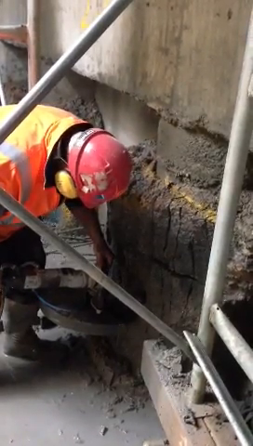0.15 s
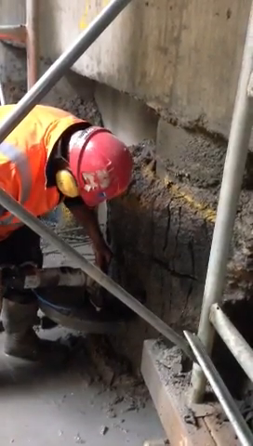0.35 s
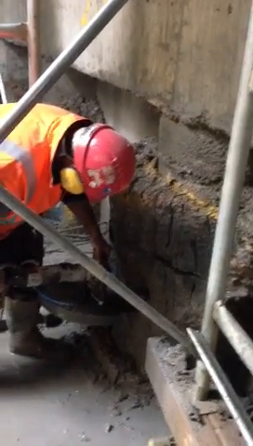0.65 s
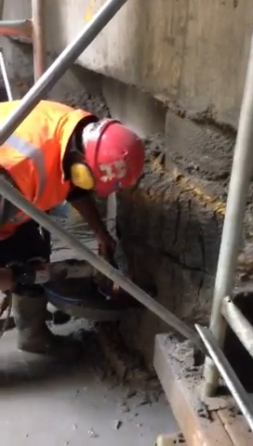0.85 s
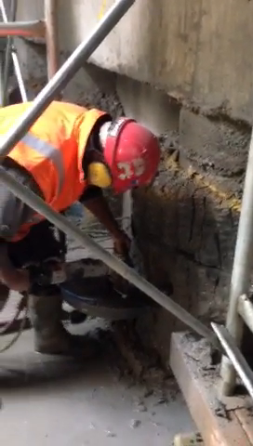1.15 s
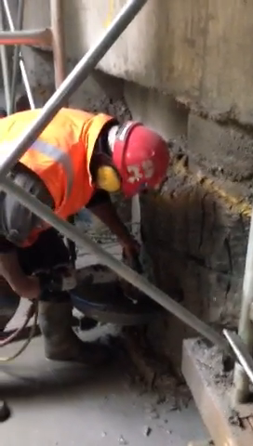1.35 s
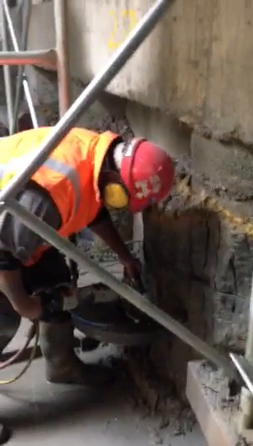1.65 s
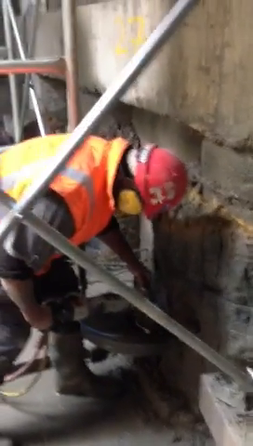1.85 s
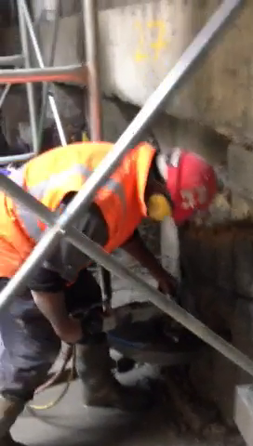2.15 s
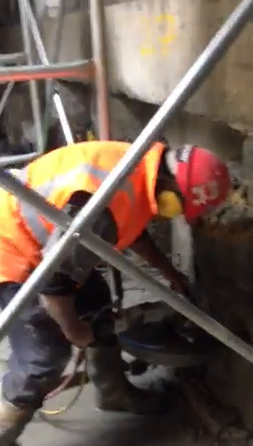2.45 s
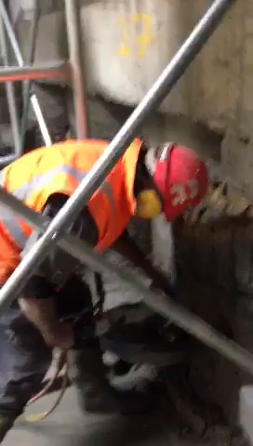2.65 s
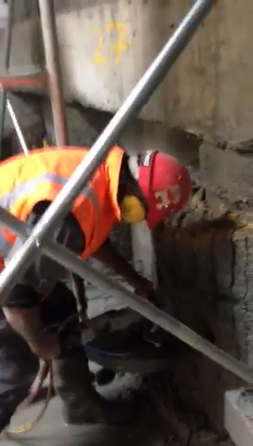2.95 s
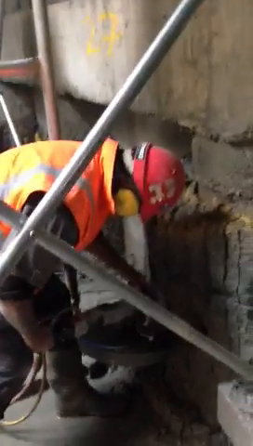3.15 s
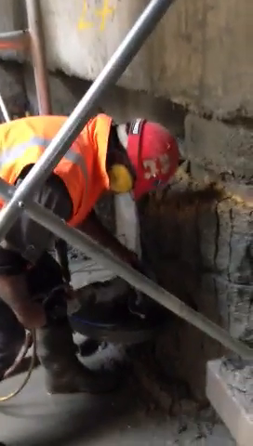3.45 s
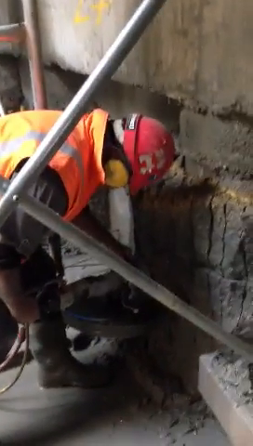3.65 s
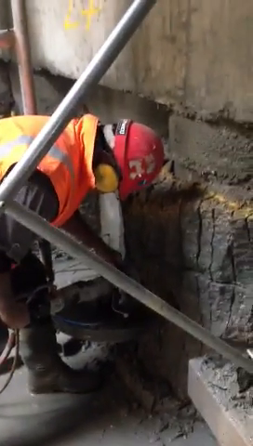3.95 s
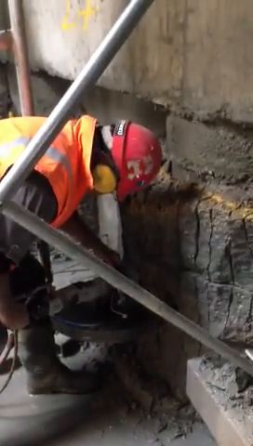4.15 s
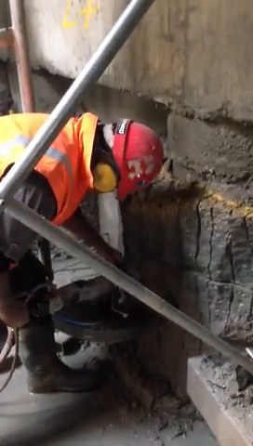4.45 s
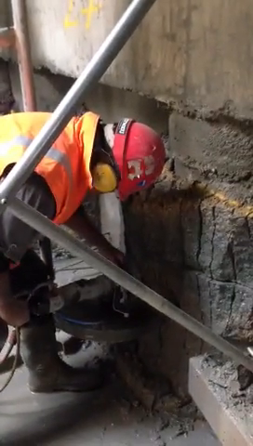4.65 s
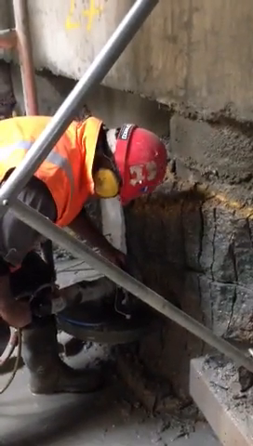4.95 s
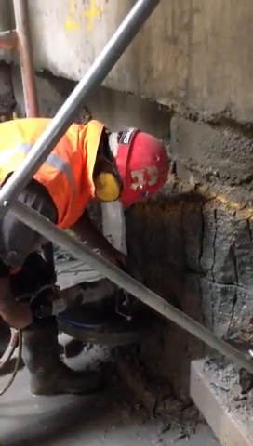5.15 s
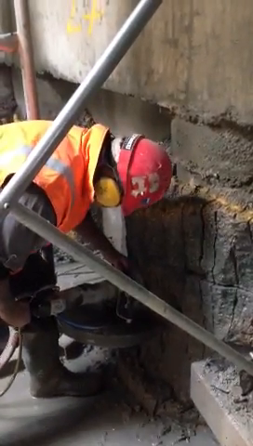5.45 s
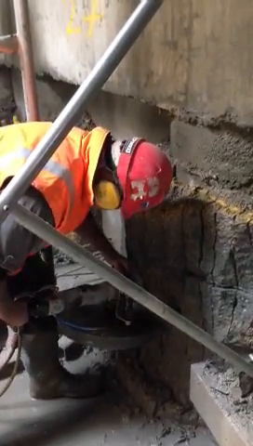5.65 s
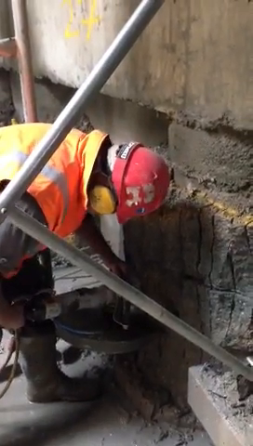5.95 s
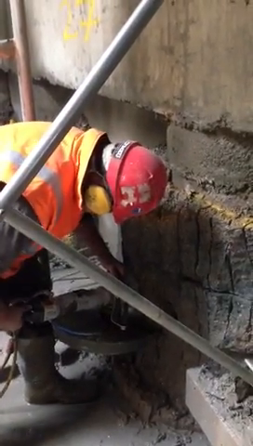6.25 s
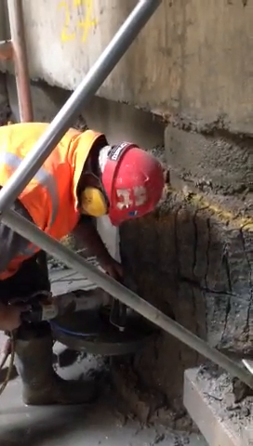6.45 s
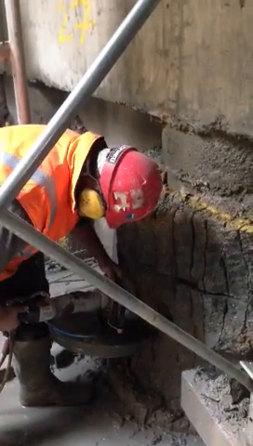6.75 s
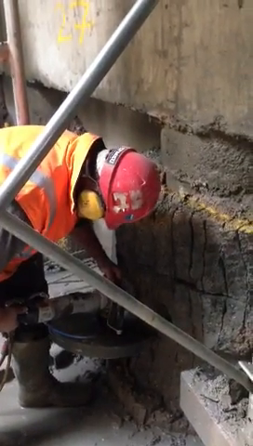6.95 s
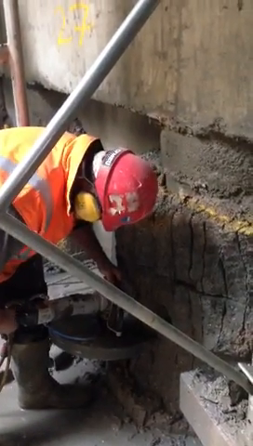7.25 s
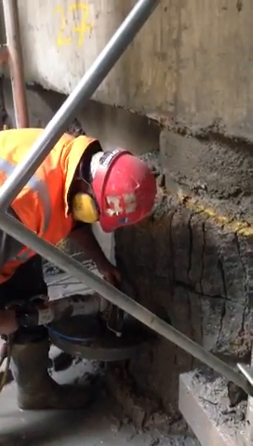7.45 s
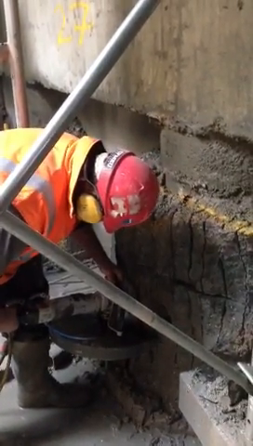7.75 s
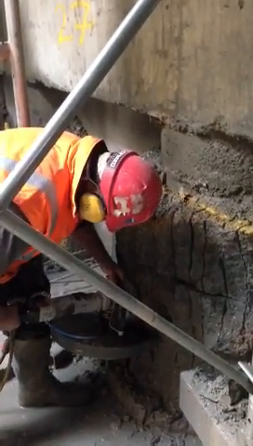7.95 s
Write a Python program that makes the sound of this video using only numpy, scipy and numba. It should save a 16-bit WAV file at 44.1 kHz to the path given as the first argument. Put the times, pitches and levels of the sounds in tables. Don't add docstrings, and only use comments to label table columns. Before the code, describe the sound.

An electric diamond saw is at full cut from 0 s, loud and unbroken for about eight seconds. The main sound is a harsh, bright, gritty roar of blade on concrete, strongest around 3 to 6 kHz, with spray-like hiss above and a fast flutter from some 45 blade turns a second. Steel ringing and gear-like whines slide in and out. Pushing hardest around 2 to 3 s, the cut screams more sharply; from 3 s the pitch sags, a strong whine near 3.5 kHz standing out at 3.8 s, lowest around 4.2 to 4.4 s. It climbs back by 4.8 s and peaks near 6.1 s, with brief dips in grip and a throatier growl. A harder housing drag and thump comes at 6.4 s. Low wet rubble and hose thumps scatter throughout, clustered near 2.6 s. Mono phone, a few metres away, little bass, slightly crushed treble; cutting continues to the end.

```python
import sys
import numpy as np
from scipy import signal
from scipy.fft import rfft, irfft, next_fast_len
from scipy.io import wavfile
from scipy.ndimage import uniform_filter1d, map_coordinates
from numba import njit

SR = 44100
rng = np.random.default_rng(int(sys.argv[2]) if len(sys.argv) > 2 else 0)


def to_wav(sig):
    pcm = np.clip(np.atleast_2d(sig), -1, 1) * 32767
    pcm = np.round(pcm).astype(np.int16)
    wavfile.write(sys.argv[1], SR, pcm.T)


def magnitude_from_level(level_db):
    exponent = np.asarray(level_db, float) / 20
    return 10 ** exponent


N = 357651
TICKS = np.arange(0, N + 64, 64) / SR


def curve(table):
    s, *columns = np.transpose(table)
    return [np.interp(TICKS, s, c) for c in columns]


def fine(slow):
    return np.interp(np.arange(N) / SR, TICKS, slow)


def on_log(hz, table):
    points, values = np.transpose(table)
    return np.interp(np.log(np.maximum(hz, 1)), np.log(points), values)


def unit(x):
    return x / np.sqrt(np.mean(x ** 2))


def walk(rate):
    k = max(round(1 / (rate * TICKS[1])), 1)
    held = np.repeat(rng.standard_normal(len(TICKS) // k + 1), k)
    slewed = uniform_filter1d(uniform_filter1d(held, k), k)
    return unit(slewed[:len(TICKS)])


def bump(at_s, length_s):
    return np.exp(-((TICKS - at_s) / length_s) ** 2)


def swells(table):
    return sum(magnitude_from_level(db) * bump(at_s, length_s) for at_s, length_s, db in table)


def slab(x, low_hz, high_hz):
    size = next_fast_len(N)
    hz = np.arange(size // 2 + 1) * SR / size
    return irfft(rfft(x, size) * (hz > low_hz) * (hz < high_hz), size)[:N]


# time in seconds, speed in turns per second.
BLADE_SPEED = [(0, 46.19), (.32, 46.38), (.97, 45.23), (1.53, 45.72), (2.4, 45.22), (2.75, 45.56),
               (3.1, 44.5), (3.5, 42.15), (3.85, 41.65), (4.18, 40.72), (4.42, 40.75), (4.8, 44.45),
               (5.35, 44.65), (5.76, 45.35), (6.08, 47.15), (6.7, 45.03), (7.27, 46.04), (8.11, 44.1)]


def blade_angle():
    speed = uniform_filter1d(curve(BLADE_SPEED)[0], size=100)
    return np.cumsum(fine(speed)) / SR


# frequency in Hz, share from 0 to 1.
REPEATING_SHARE = [(200, 0.2), (1200, 0.51), (2300, 0.47), (4000, 0.36), (6500, 0.17), (11000, 0.08)]


def scrape(angle):
    steps = 1024
    memory = 0.863
    grit = rng.standard_normal((int(angle[-1]) + 2, steps))
    worn = signal.lfilter([1], [1, -memory], grit, axis=0).ravel()
    size = next_fast_len(N)
    hz = np.arange(size // 2 + 1) * SR / size
    again = rfft(map_coordinates(worn, [angle * steps], order=3), size)
    again /= np.sqrt(uniform_filter1d(abs(again) ** 2, size=8000))
    fresh = rfft(rng.standard_normal(size)) / np.sqrt(size)
    share = np.clip(on_log(hz, REPEATING_SHARE), 0, 1)
    return hz, np.sqrt(share) * again + np.sqrt(1 - share) * fresh


# frequency in Hz, level in dB per Hz.
SAW_AND_WALL = [(35, -78), (60, -47.5), (192, -19), (273, -17.5), (456, -15), (761, -21.5), (1150, -16),
                (1690, -16), (2850, -4.5), (3800, 0), (6500, -4.5), (6970, -8), (11600, -8.5), (14300, -14),
                (15800, -21)]


def coloured_bands(angle):
    hz, force = scrape(angle)
    ripple = uniform_filter1d(rng.standard_normal(len(hz)), size=900)
    ripple = unit(uniform_filter1d(ripple, size=900))
    colour = force * magnitude_from_level(on_log(hz, SAW_AND_WALL) + 0.7 * ripple)
    edges = np.array([0, 300, 1700, 3700, 7300, SR])
    return [irfft(colour * (hz >= a) * (hz < b))[:N] for a, b in zip(edges, edges[1:])]


@njit
def ring(x, g, k):
    y, b, l = np.empty(len(x)), 0., 0.
    for i in range(len(x)):
        v = (b + g[i] * (x[i] - l)) / (1 + g[i] * (g[i] + k))
        b, l, y[i] = 2 * v - b, l + 2 * g[i] * v, k * v
    return y


# frequency in Hz, width in
# Hz, level in dB, time of the change in seconds, its length in seconds, change in dB.
BLADE_MODES = [(490, 70, -28, 6.7, 3.4, 27.5), (633, 21, -4, 0.66, 2.2, 8), (2010, 76, -5, 0.25, 0.36, 8),
               (2490, 78, -4.5, 4.1, 0.97, 8), (2702, 42, 0.5, .1, 0.66, 11),
               (2983, 55, -2.5, 0.88, 0.66, 12), (3213, 38, 0.5, 6.3, 0.89, 10),
               (3527, 64, 3, 5.26, 0.45, 5), (3915, 48, -13, 7.67, .5, 20), (4096, 30, -1, 4.8, 0.83, 9),
               (4620, 68, -5, 1.3, 0.41, 1), (5044, 91, 0, 5.1, 0.59, 3), (5470, 83, -2, 7.5, 0.93, -5),
               (6490, 32, 0, 0.91, 1.2, -8), (7040, 76, 3, 6.7, 0.24, 5), (7620, 92, -1.5, 2.7, 0.47, 3)]


def blade_ringing(drive):
    total = np.zeros(N)
    for mode_hz, width_hz, db, at_s, length_s, swell_db in BLADE_MODES:
        drift = 1 + .005 * walk(3)
        mode = ring(drive, fine(np.tan(np.pi * mode_hz * drift / SR)), width_hz / mode_hz)
        total += mode * fine(magnitude_from_level(db + swell_db * bump(at_s, length_s) + 2.3 * walk(8)))
    return total


# time in seconds, length in seconds, level in dB.
RUBBLE_THUMPS = [(.01, 0.055, -45), (.3, 0.26, -49), (.72, 0.077, -44), (1.05, 0.088, -52),
                 (1.33, 0.1, -58), (1.83, .03, -59), (2.44, 0.066, -48), (2.57, 0.026, -39),
                 (2.66, 0.07, -41.5), (2.86, 0.091, -42), (2.96, .04, -53), (3.56, 0.053, -60),
                 (3.75, 0.036, -56), (4.12, 0.086, -47), (4.38, 0.081, -45.5), (5.15, 0.49, -52),
                 (5.51, 0.023, -43), (5.64, 0.074, -52), (6.13, .12, -53), (6.42, 0.096, -40),
                 (7.02, 0.072, -45), (7.25, 0.083, -49), (7.68, 0.16, -51), (7.91, 0.044, -47)]
# time in seconds, length in seconds, dB over its usual noise.
HOUSING_SCRAPES = [
    (.03, 0.088, -11),
    (6.43, 0.095, 0.5),
]


def housing_and_rubble(housing, rumble, cut_db, growl_db):
    thumps = swells(RUBBLE_THUMPS)
    shaking = 1 + magnitude_from_level(37.5) * thumps / 2 + swells(HOUSING_SCRAPES)
    body = housing * fine(magnitude_from_level(cut_db - 2.5 + 1.2 * growl_db) * shaking)
    knocking = magnitude_from_level(0.5 * walk(32))
    rubble = unit(rumble) * fine((magnitude_from_level(-56.5 + 1.2 * growl_db) + thumps) * knocking)
    return body + rubble


# time in seconds, grinding in dB, water spray over it in dB,
# burial of the rim in dB of growl.
CUT_PUSH = [(0, -17, -2.5, 0.5), (.5, -17.9, -1.5, 0.5), (1.0, -17, -2.5, -1.1), (1.5, -17, -3, 1.5),
            (2.0, -16, -3.5, -1.5), (2.35, -16.5, -1.5, -2), (2.66, -15.5, -.5, -2.5),
            (3.04, -16.5, -4, -1), (3.45, -17, -4, -0.7), (3.8, -18, -5, -.4), (4.4, -17.5, -3, 1.4),
            (4.85, -18, -2, 1.9), (5.45, -17.3, -3, 3), (5.75, -17, -3, -.5), (6.27, -19.5, -3, 5),
            (6.65, -17, -3.5, -0.5), (7.2, -17.5, -3.5, 1.8), (8.11, -18.5, -2, 1.9)]
# time in seconds, change in dB.
GRIP_SLIPS = [(.36, 2), (.45, -3), (.77, -2), (1.16, -1), (3.28, 0), (4.95, -0.5), (5.41, -2.5), (5.58, -2),
              (5.66, 0.5), (5.89, -1.5), (6.04, -2), (6.27, -2.5), (6.37, -2), (6.54, 0.5), (7.13, -2),
              (7.38, -2), (7.52, -0.5)]


def grinding(angle):
    cut_db, spray_db, growl_db = curve(CUT_PUSH)
    slip_s = 0.029
    cut_db = cut_db + sum(db * bump(at_s, slip_s) for at_s, db in GRIP_SLIPS)
    rumble, housing, growl, grind, spray = coloured_bands(angle)
    scale = 1 / np.std(slab(grind, 4000, 7000))
    grind = grind + growl * fine(magnitude_from_level(growl_db))
    grind = grind + blade_ringing(housing + grind + spray)
    water = unit(spray) * fine(magnitude_from_level(spray_db + 0.51 * walk(40)))
    high = scale * grind * magnitude_from_level(-1.1) + water
    low = housing_and_rubble(scale * housing, rumble, cut_db, growl_db)
    bite_db = 0.56 * np.cos(2 * np.pi * angle) + 0.2 * np.cos(4 * np.pi * angle)
    bite_db += 0.46 * fine(walk(14))
    return (high * fine(magnitude_from_level(cut_db)) + low) * magnitude_from_level(bite_db)


def partials(angle, orders, gains):
    out = np.zeros(N)
    for order, gain in zip(orders, gains):
        gain = fine(gain * magnitude_from_level(2.2 * walk(35)))
        on = gain > magnitude_from_level(-75)
        out[on] += gain[on] * np.sin(2 * np.pi * (order * angle[on] + rng.random()))
    return np.sqrt(2) * out


CONTACT_ORDERS = (22, 66, 28, 56, 84, 112, 140)
CONTACT_HUM = (-53, -53, -49.5, -57, -59.5, -44, -52)
# time in seconds, length in seconds, level in dB.
GEAR_BITES = [(.3, 0.12, -53), (1.3, 0.66, -43), (2.27, 0.35, -39), (2.95, 0.28, -41), (3.45, 0.13, -39),
              (4.3, 0.63, -49), (5.05, .17, -43), (5.5, 0.17, -40.5), (6.0, 0.064, -34), (6.33, 0.16, -37),
              (7.85, 0.34, -46.5)]
GEAR_3RD_BITES = [(.7, 0.16, -25), (1.0, 0.12, -23), (1.33, 0.088, -34), (1.7, .12, -30), (2.0, .1, -27),
                  (2.8, 0.3, -30.5), (4.45, 0.13, -35), (5.0, 0.079, -31), (6.55, .12, -32),
                  (7.17, .1, -28), (7.5, .12, -31)]
SEGMENT_BITES = [
    (.02, .15, -39),
    (.83, 0.084, -38),
    (2.25, 0.19, -41.5),
    (3.0, 0.24, -46),
    (5.08, 0.15, -40),
    (5.8, 0.22, -48),
    (7.0, .1, -39),
    (7.6, .18, -39.5),
    (8.0, .1, -46),
]
SEGMENT_2ND_BITES = [(1.3, 0.26, -45), (1.83, 0.086, -32), (3.38, 0.16, -25.5), (4.03, 0.1, -29),
                     (4.33, 0.22, -32), (4.97, 0.19, -28), (5.33, .1, -32), (5.671, .1, -31),
                     (6.0, .1, -38), (6.8, 0.16, -30.5), (8.05, .2, -41)]
SEGMENT_3RD_BITES = [(.35, .25, -28), (.68, 0.12, -29), (1.0, 0.14, -26), (1.65, 0.44, -24),
                     (2.45, 0.15, -20.5), (2.83, .1, -24), (3.12, .17, -24.5), (3.48, .17, -21),
                     (3.8, 0.18, -12.5), (4.15, .1, -32), (4.5, .1, -32), (7.12, 0.3, -24)]
SEGMENT_4TH_BITES = [
    (.08, .17, -29),
    (.82, .1, -26),
    (1.33, .1, -33),
    (2.2, 0.17, -30),
    (2.5, .12, -21),
    (2.75, .17, -27),
    (3.35, .22, -32),
    (4.0, 0.11, -26),
    (6.75, .15, -30),
    (7.5, .12, -34),
]
SEGMENT_5TH_BITES = [
    (.6, .2, -36),
    (1.2, .25, -33),
    (1.67, .1, -26),
    (2.05, .2, -33),
    (2.72, 0.15, -24),
    (3.0, 0.085, -38),
    (4.05, .15, -37),
    (7.0, .3, -41),
]


def contact_whine(angle):
    bites = (GEAR_BITES, GEAR_3RD_BITES, SEGMENT_BITES, SEGMENT_2ND_BITES,
             SEGMENT_3RD_BITES, SEGMENT_4TH_BITES, SEGMENT_5TH_BITES)
    gains = [magnitude_from_level(db) + swells(table) for db, table in zip(CONTACT_HUM, bites)]
    return partials(angle, CONTACT_ORDERS, gains)


HIGH_ORDERS = (168, 196, 224, 252, 280, 308, 336)
HIGH_LEVELS = (-50, -54, -55, -57, -57, -59, -59)


def high_whine(angle):
    gains = [magnitude_from_level(db + 3.2 * walk(4.6)) for db in HIGH_LEVELS]
    return partials(angle, HIGH_ORDERS, gains)


PASSING_ORDERS = (44, 5, 7, 70, 14, 70, 47, 70, 60, 44, 10, 14, 60, 42, 5, 70, 11, 7, 5, 4, 70, 44, 60)
# time in seconds, length in seconds, level in dB.
PASSING_SWELLS = [(0.23, 0.41, -35), (0.105, 0.39, -52), (0.96, 0.32, -52), (0.62, .2, -27.5),
                  (1.54, 0.42, -46.5), (1.42, 0.18, -29), (2.1, 0.36, -51), (2.04, 0.22, -33),
                  (2.6, 0.18, -47), (3.65, 0.45, -37), (3.962, 0.3, -47), (4.94, 0.26, -42),
                  (5.16, 0.42, -31), (5.36, 1, -41.5), (5.55, 0.24, -51), (5.4, 0.3, -39), (7.8, 1, -56),
                  (7.2, 0.54, -47.5), (7.29, .4, -50.5), (7.372, 0.43, -53), (7.27, 0.24, -31.5),
                  (7.9, 0.96, -40.5), (7.598, 0.19, -33)]


def passing_whine(angle):
    gains = [magnitude_from_level(db + 3 * walk(12)) * bump(at_s, length_s) for at_s, length_s, db in PASSING_SWELLS]
    return partials(angle, PASSING_ORDERS, gains)


def scene():
    angle = blade_angle()
    contact_angle = angle + .0012 * fine(walk(40))
    saw = grinding(angle)
    saw += contact_whine(contact_angle) + high_whine(contact_angle) + passing_whine(contact_angle)
    return np.array([saw, saw])


# low edge in Hz, high edge in Hz, rarity in spreads of chance.
EMPTY_BANDS = [(12120, 12230, .9), (12520, 12620, .7), (13150, 13250, .8), (13470, 13700, -.5),
               (14280, 14420, .6), (14860, 15030, -.5)]


def thin_bands(x):
    for low_hz, high_hz, rarity in EMPTY_BANDS:
        gate = uniform_filter1d(1. * (walk(22) > rarity), size=12)
        x = x - slab(x, low_hz, high_hz) * fine(gate)
    return x


# frequency in Hz, rarity in spreads of chance.
HOLE_RARITY = [(3000, 2.8), (11000, 2.2), (12500, 1.3), (15000, .6)]


def specks(x):
    hz, _, frames = signal.stft(x, SR, nperseg=1024)
    chance = uniform_filter1d(rng.standard_normal(frames.shape), size=3, axis=0)
    chance = unit(uniform_filter1d(chance, size=6, axis=1))
    below = hz < HOLE_RARITY[0][0]
    kept = (chance < on_log(hz, HOLE_RARITY)[:, None]) | below[:, None]
    return signal.istft(frames * kept, SR, nperseg=1024)[1][:N]


# time in seconds, low edge in Hz, high edge in Hz, level in dB.
HISS_PATCHES = [(0.227, 4177, 5727, -22), (0.228, 10335, 13135, -27), (0.415, 6890, 8268, -31),
                (1.064, 6890, 8957, -27), (1.646, 12360, 13781, -37), (1.669, 4608, 5727, -24),
                (2.482, 6244, 8268, -23), (2.528, 7579, 8957, -27), (2.715, 9603, 11068, -26),
                (3.364, 8225, 10335, -28), (4.594, 7579, 9646, -27), (4.966, 5167, 6287, -24),
                (5.617, 4608, 5727, -23), (7.427, 9646, 11068, -31), (8.011, 11670, 13092, -30)]


def opposed_hiss(x):
    step, offset = 1024, 443
    n = np.arange(2 * step) + .5
    for s, low_hz, high_hz, db in HISS_PATCHES:
        bins = np.arange(round(low_hz * 2 * step / SR), round(high_hz * 2 * step / SR)) + .5
        hiss = rng.standard_normal(len(bins)) @ np.cos(np.pi / step * np.outer(bins, n + step / 2))
        hiss = unit(hiss) * np.sin(np.pi * n / (2 * step)) * magnitude_from_level(db - 1.5)
        start = offset + step * round((s * SR - offset) / step - 1)
        x[:, start:start + len(n)] += np.array([hiss, -hiss])
    return x


def low_pass(x):
    return signal.sosfilt(signal.butter(12, 15330, fs=SR, output="sos"), x)


def record(dry):
    mono = dry[0] / (1 + (dry[0] / .8) ** 6) ** (1 / 6)
    mono = signal.sosfilt(signal.butter(1, 90, "highpass", fs=SR, output="sos"), mono)
    mono = specks(thin_bands(mono))
    mix = opposed_hiss(np.array([mono, mono]))
    return low_pass(mix)


dry = scene()
out = record(dry)
to_wav(out)
```